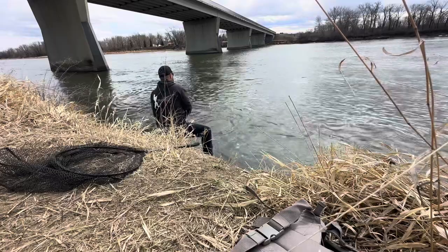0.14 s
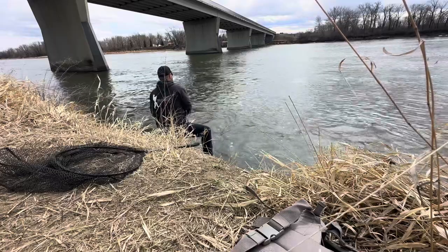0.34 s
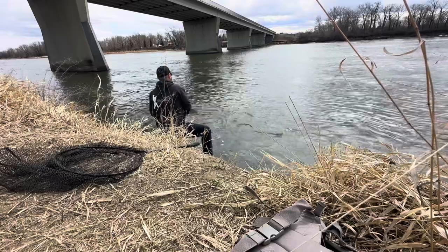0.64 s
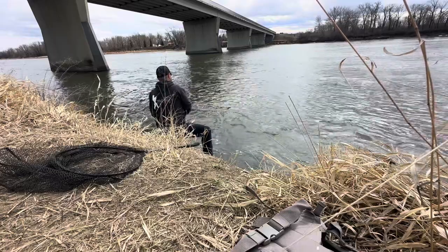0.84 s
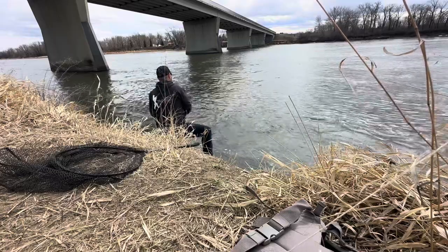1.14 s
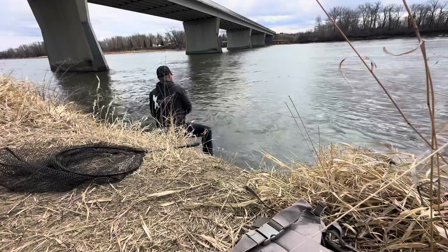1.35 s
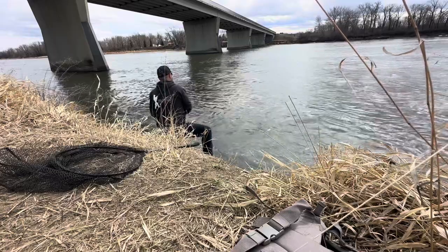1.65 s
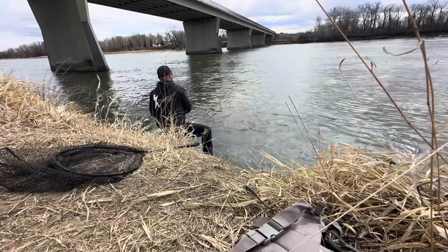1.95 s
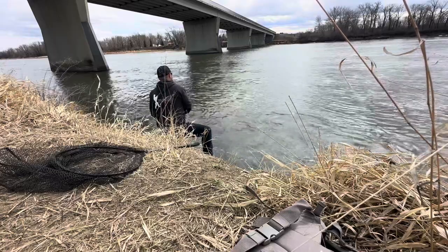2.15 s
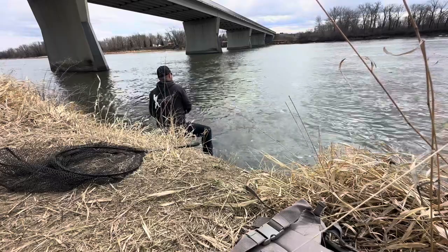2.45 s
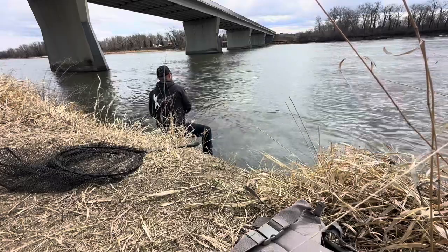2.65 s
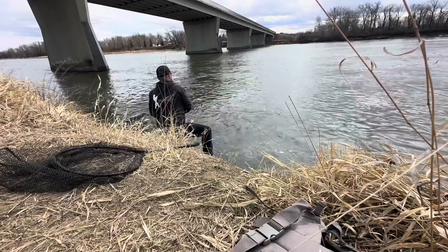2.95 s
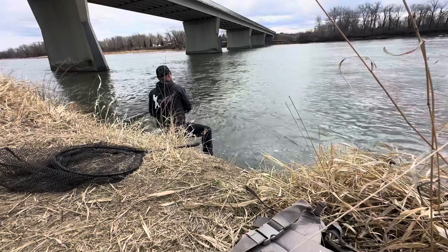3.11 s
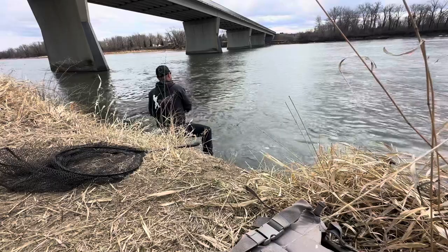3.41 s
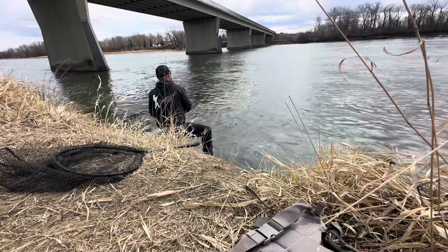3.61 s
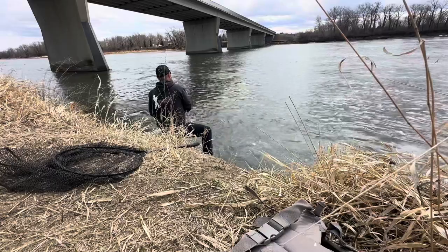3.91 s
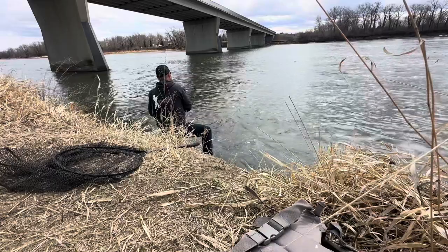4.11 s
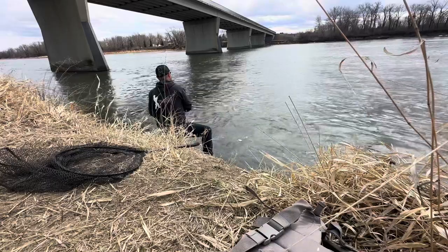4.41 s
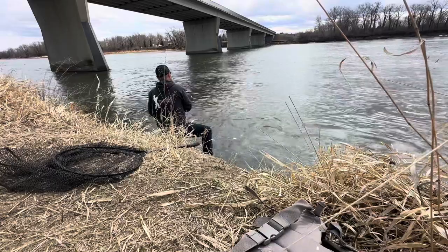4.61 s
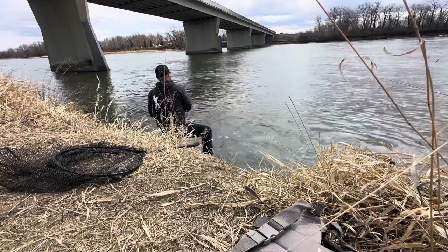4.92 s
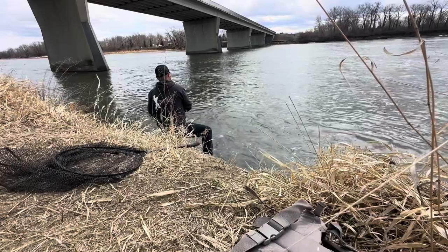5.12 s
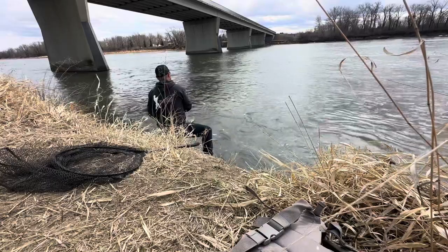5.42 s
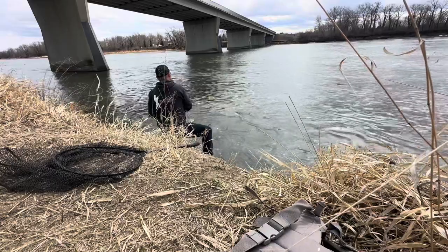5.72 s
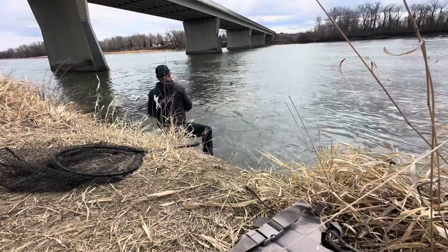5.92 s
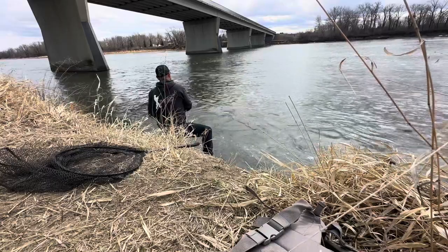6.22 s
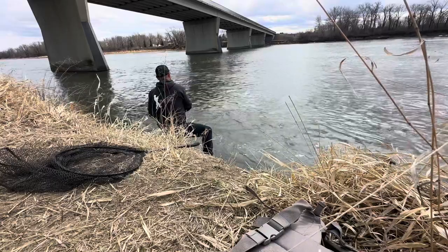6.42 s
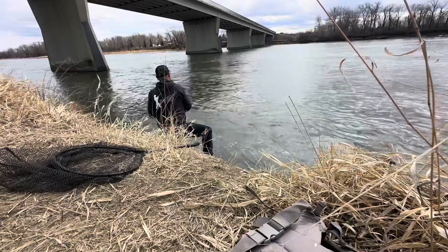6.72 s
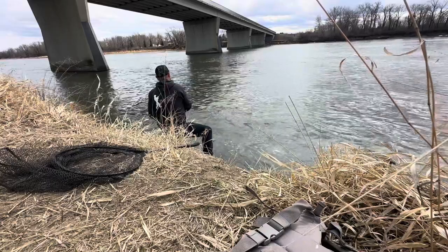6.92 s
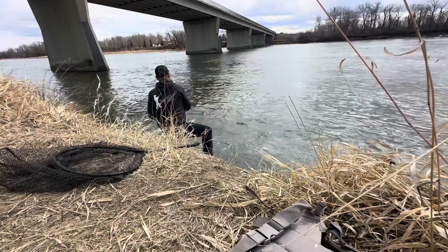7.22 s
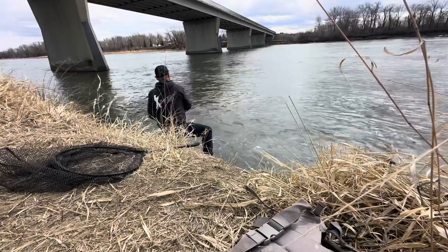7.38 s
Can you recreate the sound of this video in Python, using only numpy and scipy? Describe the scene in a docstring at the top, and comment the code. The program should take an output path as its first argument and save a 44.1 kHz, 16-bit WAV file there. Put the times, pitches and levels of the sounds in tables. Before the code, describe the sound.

A heavy lorry approaches on a concrete highway bridge, heard in stereo from the river bank below. Its low rumble and tyre roar grow steadily, drifting slightly from right to left, as axles slap over joints and the deck booms. Tyre hiss and whine rise, and a throbbing engine comes in late. Underneath are a low drone, distant traffic, light wind on the microphones and faintly rustling dry grass.

```python
"""A heavy lorry nears on a concrete highway bridge above a river bank, crossing from right to left.
Its rumble and tyre roar come direct and off the water; tyres hiss, whine and hum on the grooved deck,
axles slap over the joints and the deck booms. Engine throb and a thin blower whistle come in late.
Behind it: a low drone, far traffic, wind on the microphones, dry grass rustling and ticking."""
import sys
import numpy as np
from scipy import signal
from scipy.io import wavfile
from scipy.ndimage import uniform_filter1d

SR = 44100
rng = np.random.default_rng(int(sys.argv[2]) if len(sys.argv) > 2 else 0)


def to_wav(sig):
    """Store sig (one row per channel, or 1-D mono) as 16-bit WAV at the path in sys.argv[1].

    Samples outside -1..1 are clipped; the rate is SR.
    """
    pcm = np.clip(np.atleast_2d(sig), -1, 1) * 32767
    pcm = np.round(pcm).astype(np.int16)
    wavfile.write(sys.argv[1], SR, pcm.T)  # frames by channels


N = 332955
FFT, HOP = 2048, 512
HZ = np.fft.rfftfreq(FFT, 1 / SR)[:, None]  # bin frequencies
T = np.arange(N // HOP + 3) * HOP / SR  # frame times/s

# stereo balance of far traffic and grass rustle: f/Hz, left-right/dB
BACKGROUND_PAN = [(300, -1.8), (1000, -4), (2000, -1.5), (4500, 8), (9000, -3.5), (13000, -3.5)]


def lorry():
    """Noise, joint slaps, engine and whistle on one moving path."""
    # path: t/s, water echo lag/ms, base left lead/ms, base left-right/dB
    path = [(0, 0.82, -0.099, 0.5), (1, 0.9, 0.059, 0), (2, 1.5, 0.03, -0.5), (3, 1.64, -0.0051, -1),
            (4, 1.96, -0.051, -0.5), (5, 2.57, 0.0052, 0.5), (5.6, 2.97, 0.093, 1), (6.2, 4.1, 0.16, 2),
            (6.8, 5.34, 0.32, 2.5), (7.55, 5.4, 0.4, 2)]
    # coherence of the microphones: f/Hz, coherence
    coherence = [(60, 1), (200, 0.97), (700, 0.91), (1200, 0.56), (3000, 0.52), (8000, 0.25)]
    # bending round the microphone housing: f/Hz, factor on lead
    diffraction = [(60, 0.46), (260, 1.9), (520, 1.49), (900, 1.28), (1600, 0.97), (3000, 0.92)]
    # shadowing: f/Hz, factor on left-right dB
    shadow = [(200, 0.2), (450, 0.1), (800, 3.5), (1300, 2.5), (2200, 0.5), (3200, 1.5), (4500, 3.5),
              (6500, 4.5), (9000, -1.5)]
    echo_ms, lead_ms, pan_db = columns(path, T)
    comb = water_echo(echo_ms)
    mag = np.sqrt(rolling_power(comb) + whine_power())
    sound = mag * noise() + comb * joint_slaps() + engine() + blower_whistle()
    return stereo(sound, mag * noise(), at_hz(coherence),
                  lead_ms * at_hz(diffraction), pan_db * at_hz(shadow))


def rolling_power(comb):
    """Power spectra of deck and tyre noise; all but the hiss swell as the axles cross each joint."""
    # approach: t/s, deck rumble/dB, tyre roar/dB, tyre hiss/dB
    levels = [(0, -39, -52, -68), (.4, -41, -52.5, -72), (.8, -40.5, -50.5, -73), (1.6, -40.5, -49, -68),
              (2.0, -37.5, -48.5, -67.5), (2.4, -38.5, -48, -66.5), (2.8, -39, -49, -65),
              (3.2, -36.5, -46.5, -63.5), (3.6, -37.5, -45.5, -61), (4, -35, -45, -60.5),
              (4.8, -36, -42, -57.5), (5.4, -36, -40, -57.5), (6, -39, -38.5, -55),
              (6.35, -39.5, -38.5, -52.5), (6.7, -36.5, -35, -53.5), (7.1, -36, -35.5, -53.5),
              (7.35, -33.5, -34.5, -52), (7.55, -30.5, -35, -53.5)]
    # spectral shapes: f/Hz, density/dB
    shudder_shape = [(12, -38.5), (25, -19.5), (40, -6.5), (52, -2.5), (65, -17), (100, -59.5), (200, -120)]
    rumble_shape = [(25, -46.5), (48, -17), (65, -4), (97, 1), (140, -3.5), (165, -10), (200, -5),
                    (230, -15.5), (260, -29), (340, -48), (600, -120)]
    roar_shape = [(76, -35), (130, -8), (192, -3), (301, -7), (343, -7), (430, -10), (698, -12.5),
                  (1160, -17), (1320, -22.5), (2200, -33.5), (2860, -55), (4840, -120)]
    hiss_shape = [(900, -37), (1400, -5), (1900, -8), (2600, -11), (3400, -15), (4500, -19), (5500, -20.5),
                  (6500, -23.5), (7500, -32), (9500, -49.5), (12000, -63.5)]
    # air absorption: t/s, tilt/(dB/kHz)
    air_loss = [(0, 1.6), (3, 4), (4.5, 4), (5.6, 1.4), (6.3, 1.5), (6.9, 1.2), (7.35, 1.5), (7.55, 1.5)]
    first_s, period_s, swell_s = 0.15, 0.556, 0.054
    to_joint_s = (T - first_s + period_s / 2) % period_s - period_s / 2
    joint = np.exp(-(to_joint_s / swell_s) ** 2)
    rumble_db, roar_db, hiss_db = columns(levels, T)
    air = gain(-columns(air_loss, T)[0] * HZ / 1000)
    shudder = at_level(gain(at_hz(shudder_shape)), -62 + 2.5 * T + 6.5 * joint)
    rumble = at_level(gain(at_hz(rumble_shape)) * comb, rumble_db + 1.5 * joint)
    roar = at_level(gain(at_hz(roar_shape)) * comb, roar_db + 2.5 * joint)
    hiss = at_level(gain(at_hz(hiss_shape)) * air, hiss_db) * gain(1.5 * patches(bins=24, frames=14))
    return shudder ** 2 + rumble ** 2 + roar ** 2 + hiss ** 2


def water_echo(lag_ms):
    """Comb gain of direct plus reflected sound; water mirrors best at grazing incidence."""
    far, near, fade_at_s, fade_s = 0.69, 0.29, 5.43, 0.083
    reflection = near + (far - near) / (1 + np.exp((T - fade_at_s) / fade_s))
    ripple_loss = np.exp(-(HZ / 1100) ** 2)  # ripples spoil the mirror for short waves
    return abs(1 + reflection * ripple_loss * np.exp(-2j * np.pi * HZ * lag_ms / 1000))


def whine_power():
    """Power spectra of four tyre whines that enter at close range and sink in pitch."""
    # whine bands: f at entry/Hz, width/Hz
    bands = [(2500, 320), (3130, 340), (4000, 440), (4920, 1000)]
    # t/s, then level/dB per band, low to high
    levels = [(4.2, -80, -83.5, -82.5, -88.5), (4.6, -65.5, -79, -79.5, -83), (5.0, -67.5, -80.5, -84, -87),
              (5.5, -63.5, -79.5, -75, -85), (5.8, -71, -78, -76, -76.5), (6.2, -66, -72, -64.5, -72.5),
              (6.45, -71, -66, -72, -74), (6.65, -75, -67, -72, -70), (6.85, -70, -59, -70, -63),
              (7.0, -72, -64, -77, -67.5), (7.15, -70, -69, -77, -68), (7.3, -72, -61.5, -73, -63),
              (7.42, -71, -66, -67, -64.5), (7.55, -73, -71, -77, -69)]
    since_s = T - levels[0][0]
    sag = 1 - 0.02 * since_s
    entry_db = 40 * np.minimum(since_s, 0)
    return sum(band(hz * sag, width_hz, db + entry_db) ** 2
               for (hz, width_hz), db in zip(bands, columns(levels, T)))


def joint_slaps():
    """Spectra of tyres hitting joints: a hollow knock, then a rattle round the same pitch."""
    # tyre impacts: t/s, level/dB, f/Hz, rise/ms
    slaps = [(1.499, -41, 637, 1.8), (1.527, -37.5, 600, 2.2), (1.752, -43, 790, 2.4),
             (1.773, -44, 656, 2.2), (2.531, -39.5, 590, 3.4), (2.621, -40, 599, 1.8),
             (2.799, -40.5, 590, 3.4), (3.135, -39.5, 578, 3), (3.162, -35.5, 550, 1.7),
             (3.396, -30.5, 480, 1.4), (3.43, -38.5, 534, 3.5), (3.475, -39.5, 623, 4),
             (3.5, -41, 606, 3.5), (3.525, -41, 500, 3.9), (3.928, -34, 556, 1.6), (3.96, -36, 469, 3),
             (3.995, -37, 590, 2.5), (4.478, -40, 450, 2.5), (5.044, -28, 365, 2.5),
             (5.108, -29.5, 333, 4.1), (5.189, -45, 348, 3.2), (5.4, -43, 343, 3.7), (5.585, -28, 370, 2.8),
             (5.62, -28.5, 298, 2.6), (5.643, -26.5, 352, 3.9), (5.697, -31.5, 556, 2.7),
             (6.771, -39, 329, 3.2), (6.837, -29, 328, 3.5), (7.349, -22.5, 322, 3)]
    half_width_hz, rise_s, decay_s, rattle_db = 217, 0.0072, 0.022, -5
    out, t = np.zeros(len(T) * HOP), np.arange(8000) / SR
    white = rng.standard_normal((len(slaps), len(t)))
    rattles = signal.lfilter(*signal.butter(2, half_width_hz, fs=SR), white)
    tails = rattles / rattles.std() * np.exp(-t / decay_s) * (1 - np.exp(-t / rise_s))
    for (s, db, hz, rise_ms), tail in zip(slaps, tails):
        rattle = gain(db + rattle_db) * tail * np.sin(2 * np.pi * hz * t)
        add(out, s, knock(db, hz, rise_ms) + rattle)
    return stft(out)


def engine():
    """Spectra of the firing tone: fades in, sags in pitch, throbs."""
    full_at_s, full_db, fade_in_db_per_s = 6.2, -36, 35
    firing_hz, sag_hz_per_s = 70.5, 4.3
    dip_at_s, period_s, depth = 6.9, 0.351, 0.69
    since_s = T - full_at_s
    throb = 1 - depth * np.cos(np.pi * (T - dip_at_s) / period_s) ** 2
    db = full_db + fade_in_db_per_s * np.minimum(since_s, 0) + 20 * np.log10(throb)
    return tone(firing_hz - sag_hz_per_s * since_s, db, waver_hz=1.16)


def blower_whistle():
    """Spectra of the engine blower's thin, falling whistle."""
    # t/s, f/Hz, level/dB
    whistle = [(5.6, 13150, -120), (5.9, 13070, -97), (6.4, 12900, -98), (6.95, 12660, -100),
               (7.2, 12550, -120)]
    return tone(*columns(whistle, T), waver_hz=70)


def deck_booms():
    """Axle blows ring the deck low and briefly."""
    # blows: t/s, level/dB, f/Hz
    blows = [(1.77, -27.5, 85), (2.309, -24, 105), (2.32, -34.5, 214), (2.361, -25.5, 95), (2.83, -26, 113),
             (2.882, -30.5, 122), (2.941, -29.5, 136), (3.165, -25, 107), (3.411, -24.5, 95),
             (3.461, -28.5, 96), (3.96, -29, 97), (3.999, -20, 89.4), (4.047, -28, 83), (4.522, -30, 74),
             (4.81, -27, 95.5), (5.055, -22, 83), (5.116, -26, 86.5), (5.596, -23.5, 79), (5.687, -19, 73),
             (5.76, -24.5, 87), (6.202, -30.5, 80), (6.346, -24.5, 67.6), (6.963, -24.5, 72.6),
             (7.349, -26, 71.5), (7.407, -35, 72.7)]
    out = np.zeros(N)
    for s, db, hz in blows:
        add(out, s, knock(db, hz, rise_ms=9.4))
    return out


def tread_hum():
    """Tread on the grooved deck: two noise bands, the lower with a tone that fades out."""
    # t/s, low band/dB, high band/dB
    levels = [(0, -69, -57.5), (.9, -64.5, -59), (1.3, -57, -59.5), (1.9, -54.5, -61), (2.3, -57, -57),
              (2.6, -54.5, -59.5), (3.0, -51.5, -55.5), (3.4, -53, -55.5), (4.1, -51.5, -56),
              (4.3, -54, -55), (4.48, -54.5, -46), (4.7, -53.5, -57.5), (4.95, -54.5, -50.5),
              (5.07, -52, -57), (5.15, -54.5, -44), (5.4, -51.5, -52), (5.6, -51, -52), (5.72, -53, -57),
              (5.9, -55, -55), (6.16, -58, -46), (6.3, -59, -56), (6.5, -56, -56), (6.75, -51, -57),
              (7.3, -58, -55), (7.55, -52, -65)]
    # f/Hz, width/Hz, coherence, left lead/ms, left-right/dB
    bands = [(587.7, 64, 0.62, -0.26, -3), (1194.6, 69, 0.53, -0.11, -2)]
    line_hz, fade_from_s, fade_db_per_s = 587, 4.6, 25.5
    low_db, high_db = columns(levels, T)
    fade_db = fade_db_per_s * np.maximum(T - fade_from_s, 0)
    low_line = tone(np.full(len(T), line_hz), low_db - 3 - fade_db, waver_hz=4.5)
    out = np.zeros((2, N))
    for (hz, width_hz, *placement), db, line in zip(bands, (low_db, high_db), (low_line, 0)):
        mag = band(hz, width_hz, db)
        out += stereo(mag * noise() + line, mag * noise(), *placement)
    return out


def drone():
    """A low tone that sags in pitch, dips as the lorry arrives and returns."""
    # t/s, f/Hz, level/dB
    track = [(0, 166, -51), (.5, 166.6, -48.5), (1, 166.2, -50), (1.5, 166, -44), (2, 166, -42.5),
             (2.5, 166, -43), (3.0, 165.9, -43.5), (3.4, 165.5, -44.5), (3.9, 164.8, -42),
             (4.4, 164.8, -43.5), (5.1, 164.7, -45.5), (5.5, 164.5, -46), (6.0, 163, -51),
             (6.9, 161.5, -48), (7.2, 160.5, -45), (7.55, 160, -42)]
    hz, db = columns(track, T)
    sound = tone(hz, db + 0.7 * drift(len(T), 12), waver_hz=1.2)
    return stereo(sound, 0, coherence=1, lead_ms=-0.02, pan_db=0.1)


def far_traffic():
    """Distant road noise: a wide wash from the right with drifting patches."""
    # spectral shape: f/Hz, density/dB
    shape = [(130, -30.5), (220, -6), (300, -8.5), (420, -14.5), (600, -10.5), (1000, -12.5), (1300, -14),
             (1500, -23), (2200, -30), (3000, -37.5), (4200, -54), (6000, -53), (8000, -62.5),
             (9500, -54.5), (11500, -71), (14000, -68.5)]
    # coherence of the microphones: f/Hz, coherence
    coherence = [(200, 1), (400, 0.14), (1200, 0.26), (2500, 0.2), (5000, .2), (10000, 0.34), (13000, 0.83)]
    mag = at_level(gain(at_hz(shape)), db=-51) * gain(0.32 * patches(bins=30, frames=8))
    return stereo(mag * noise(), mag * noise(), at_hz(coherence),
                  lead_ms=-0.26, pan_db=at_hz(BACKGROUND_PAN))


def wind():
    """Gusts buffet the two microphone ports with uncorrelated low noise."""
    # spectral shape: f/Hz, density/dB
    shape = [(15, -22.5), (30, -12.5), (55, 2), (90, -5.5), (150, -15.5), (300, -48.5), (1000, -130)]
    mag = at_level(gain(at_hz(shape)), db=-69.5 + 5 * drift(len(T), 9))
    return stereo(mag * noise(), mag * noise(), coherence=0, lead_ms=0, pan_db=0)


def grass_rustle():
    """Dry stalks rub: a flickering rustle over a lower crackle."""
    # spectral shape: f/Hz, density/dB
    shape = [(2000, -41.5), (3500, -4), (5000, -2), (7500, -0.5), (9500, 0.5), (10500, -7), (11700, -26),
             (12800, -9), (14300, -10), (15200, -21.5)]
    # crackle swells: t/s, half length/s, level/dB
    swells = [(.25, .36, -83.5), (3.32, 0.42, -79)]
    floor_db = -91
    flicker_db = 2.8 * drift(N, 400)
    swell_db = sum((db - floor_db) * np.exp(-((T - s) / half_s) ** 2) for s, half_s, db in swells)
    crackle = band(hz=4000, width_hz=3800, db=floor_db + swell_db)
    mag = np.hypot(at_level(gain(at_hz(shape)), rustle_db(T)), crackle)
    out = stereo(mag * noise(), mag * noise(), coherence=0.15,
                 lead_ms=-0.19, pan_db=at_hz(BACKGROUND_PAN))
    return out * gain(flicker_db)


def grass_ticks():
    """Stalks snap and ring briefly: listed loud ticks, plus random ones that swell with the rustle."""
    # loud snaps: t/s, level/dB, f/Hz, left-right/dB
    loud = [(0.0313, -64, 4270, 4), (0.05, -70, 4700, 3), (0.121, -64, 3100, 3), (0.168, -67, 3400, 6),
            (0.191, -64, 3630, 2.5), (0.229, -71, 5100, 3), (0.243, -65, 3100, 2), (0.272, -71, 4700, 4),
            (0.2962, -68, 4230, 9), (0.4184, -68, 8580, -1), (0.488, -74, 8000, -1),
            (0.5482, -60.5, 9200, -9), (0.553, -66, 4000, 2), (0.9248, -70, 14010, 7),
            (1.5863, -74, 7600, -9), (1.8485, -68, 9520, -11), (1.852, -70, 6000, -6),
            (1.8525, -73, 9400, -10), (1.862, -72, 6500, -8), (1.8645, -73, 8200, -8),
            (1.8788, -69, 9000, -15), (1.8908, -66, 9300, -12), (1.9435, -70, 9000, -6),
            (1.9785, -70, 9000, -17), (2.0155, -74, 8600, -9), (2.0358, -66, 4710, -4),
            (2.2498, -73, 7710, -7), (3.035, -72, 9110, -13), (3.1193, -71, 7640, -11),
            (3.3942, -64.5, 7000, -6), (3.4025, -64, 4900, -2), (3.397, -73, 13600, 0),
            (3.402, -71, 14200, 0), (3.4092, -69, 13500, -2), (3.478, -75, 9900, -6), (3.498, -71, 6200, 2),
            (3.5189, -74, 14200, 4), (4.0647, -72, 9500, -14), (4.2293, -76, 8880, -6),
            (4.587, -56, 4480, -3), (4.784, -71, 9340, -6), (5.0105, -74, 11700, 1), (5.2, -71, 14200, 0),
            (5.43, -72, 13800, 0), (6.2048, -67, 14000, -1), (6.7211, -63, 7830, 6),
            (7.0259, -72, 7980, 11), (7.1972, -62, 8600, -7), (7.1972, -66, 12000, 0),
            (7.208, -63, 14500, 5), (7.3068, -70, 13800, 0.5), (7.3265, -65, 14400, 2),
            (7.3272, -70, 9000, 0), (7.495, -68, 10000, -2)]
    small_per_s, ring_cycles, snap_cycles, rise_s = 160, 5.5, 1.1, 0.0001
    when, weakness, pitch, side = rng.random((round(small_per_s * N / SR), 4)).T
    small_s = when * N / SR
    small_db = rustle_db(small_s) + 4 - 3 * np.log(weakness + 0.02)
    small = np.transpose([small_s, small_db, 3500 + 6300 * pitch, 1.5 - 8 * side])
    out, t = np.zeros((2, N)), np.arange(200) / SR
    for s, db, hz, pan_db in list(loud) + list(small):
        decay = np.exp(-t * hz / ring_cycles) + np.exp(-t * hz / snap_cycles)
        tick = (1 - np.exp(-t / rise_s)) * decay * np.sin(2 * np.pi * hz * t)
        add(out, s, gain(db + np.array([[pan_db], [-pan_db]]) / 2) * tick)
    return out


def rustle_db(t):
    """Grass level: the breeze plus a burst wherever stalks brush together."""
    # breeze in the grass: t/s, level/dB
    breeze = [(0, -97), (.6, -94), (1.5, -90), (2.6, -91.5), (3.45, -87), (4.6, -88.5), (6.4, -85),
              (6.8, -82), (7.2, -84.5), (7.55, -76)]
    # brushes: t/s, peak/dB
    brushes = [(.03, -86), (.3, -87), (.55, -82), (1.09, -87), (1.86, -77), (1.95, -85), (2.27, -90),
               (2.56, -85), (3.12, -79), (3.4, -78), (5.2, -83), (5.43, -82), (7.2, -71), (7.33, -73),
               (7.46, -77)]
    brush_s = 0.012
    bursts = sum(gain(db) * np.exp(-abs(t - s) / brush_s) for s, db in brushes)
    return 20 * np.log10(np.hypot(gain(columns(breeze, t)[0]), bursts))


def stereo(sound, other, coherence, lead_ms, pan_db):
    """Spectra to left and right signals: sound in phase, other in antiphase, then lead and balance."""
    mid = np.sqrt((1 + coherence) / 2) * sound
    side = np.sqrt((1 - coherence) / 2) * other
    steer = np.exp(1j * np.pi * HZ * lead_ms / 1000) * gain(pan_db / 2)
    both = np.array([(mid + side) * steer, (mid - side) / steer])
    return signal.istft(both, nperseg=FFT, noverlap=FFT - HOP)[1][:, :N]


def knock(db, hz, rise_ms):
    """A few cycles that swell and die away."""
    t = np.arange(8000) / SR
    age = t * 1000 / rise_ms
    return gain(db) * age * np.exp(1 - age) * np.sin(2 * np.pi * hz * t)


def tone(hz, db, waver_hz):
    """Spectra of a wavering sine; hz and rms db per frame."""
    t = np.arange(len(T) * HOP) / SR
    pitch_hz = np.interp(t, T, hz) + waver_hz * drift(len(t), 3000)
    phase = 2 * np.pi * np.cumsum(pitch_hz) / SR
    return stft(np.sqrt(2) * gain(np.interp(t, T, db)) * np.sin(phase))


def band(hz, width_hz, db):
    """Spectral hump of rms db."""
    return at_level(1 / (1 + (2 * (HZ - hz) / width_hz) ** 2), db)


def noise():
    """Spectra of white noise, rms 1."""
    return stft(rng.standard_normal(len(T) * HOP, dtype=np.float32))


def drift(count, span):
    """Noise smoothed over span points, rms 1."""
    return uniform_filter1d(rng.standard_normal(count), span) * np.sqrt(span)


def patches(bins, frames):
    """Random field smoothed over frequency and time, rms 1."""
    field = uniform_filter1d(rng.standard_normal((len(HZ), len(T))), bins, axis=0)
    field = uniform_filter1d(field, frames, axis=1)
    return field / field.std()


def at_level(shape, db):
    """Each frame of a spectral shape scaled to rms db."""
    return shape / np.sqrt(np.mean(shape ** 2, axis=0)) * gain(db)


def at_hz(rows):
    """(f, value) rows interpolated onto the bins in log frequency."""
    hz, value = np.transpose(rows)
    return np.interp(np.log(HZ + 1), np.log(hz + 1), value)


def columns(rows, t):
    """Value columns of a time table, interpolated at t."""
    times, *values = np.transpose(rows)
    return [np.interp(t, times, column) for column in values]


def stft(x):
    return signal.stft(x, nperseg=FFT, noverlap=FFT - HOP)[2][:, :len(T)]


def gain(db):
    return 10 ** (np.asarray(db) / 20)


def add(mix, start_s, sound):
    part = mix[..., round(start_s * SR):][..., :sound.shape[-1]]
    part += sound[..., :part.shape[-1]]


def scene():
    bridge = lorry() + deck_booms() + tread_hum()
    return bridge + drone() + far_traffic() + wind() + grass_rustle() + grass_ticks()


def record(dry):
    """Microphone bass roll-off, then a steep band limit."""
    low_hz, high_hz = 28, 15200
    thinned = signal.sosfilt(signal.butter(2, low_hz, "high", fs=SR, output="sos"), dry)
    lowpass = signal.firwin(511, high_hz, window=("kaiser", 9), fs=SR)
    return signal.oaconvolve(thinned, lowpass[None], "same")


dry = scene()
out = record(dry)
to_wav(out)
```